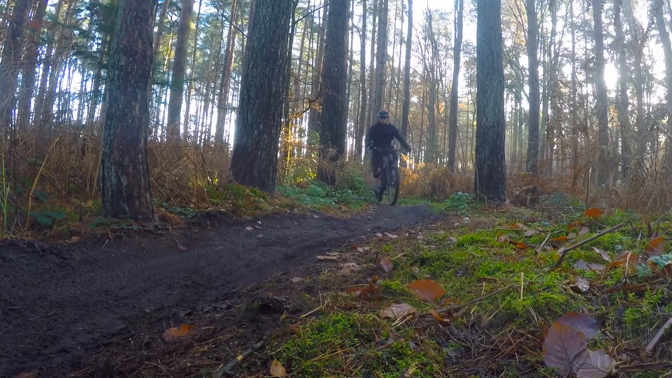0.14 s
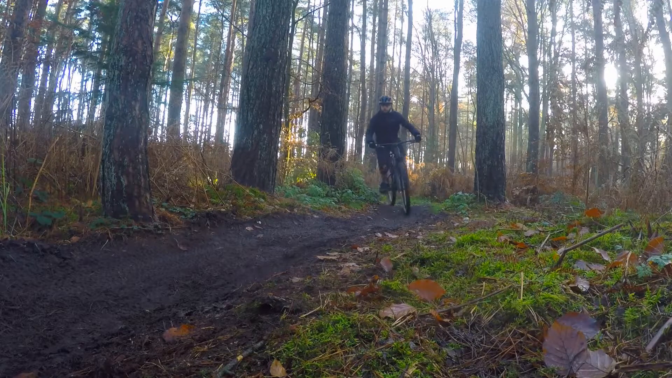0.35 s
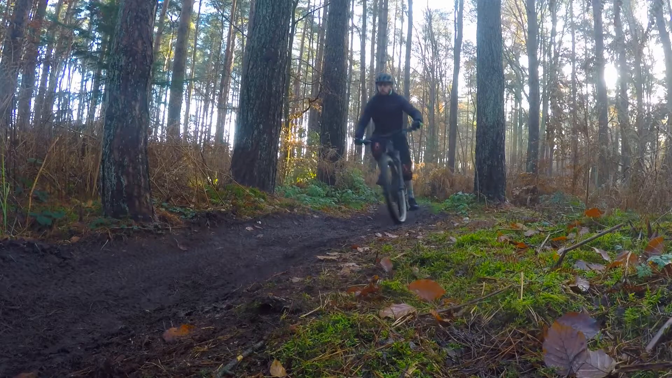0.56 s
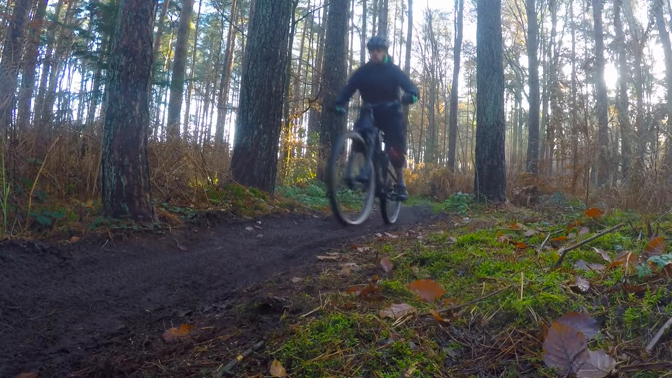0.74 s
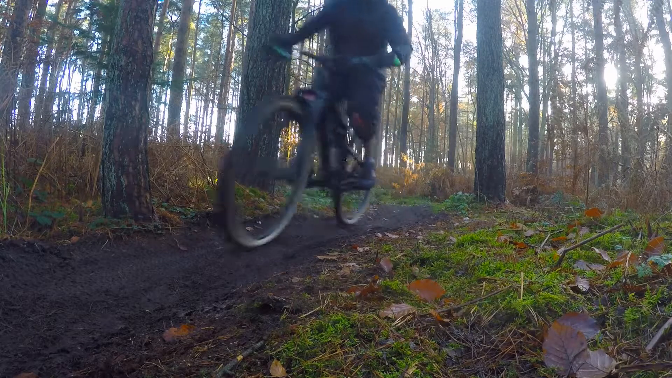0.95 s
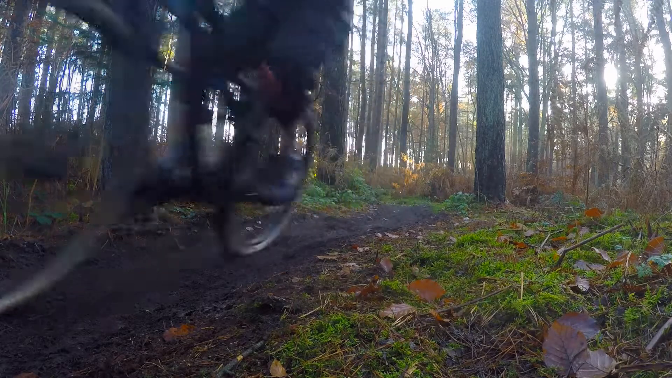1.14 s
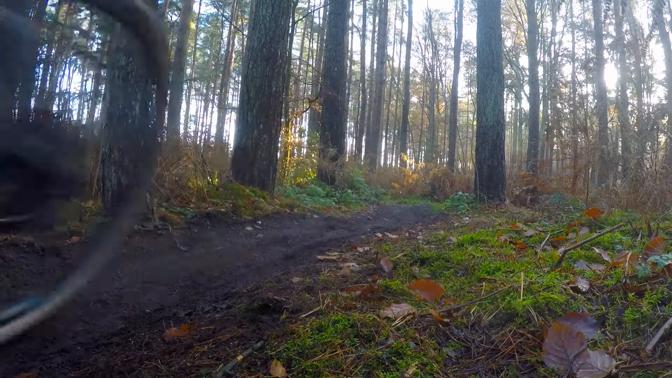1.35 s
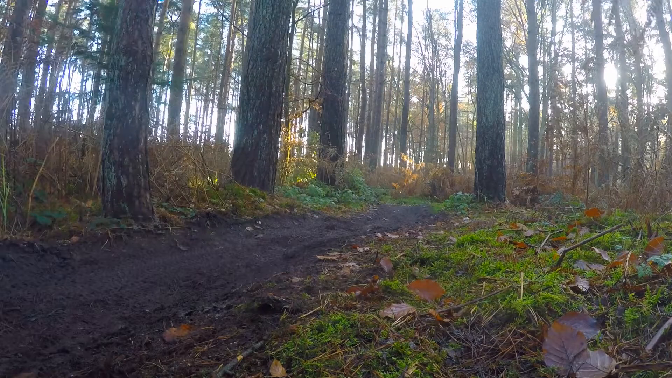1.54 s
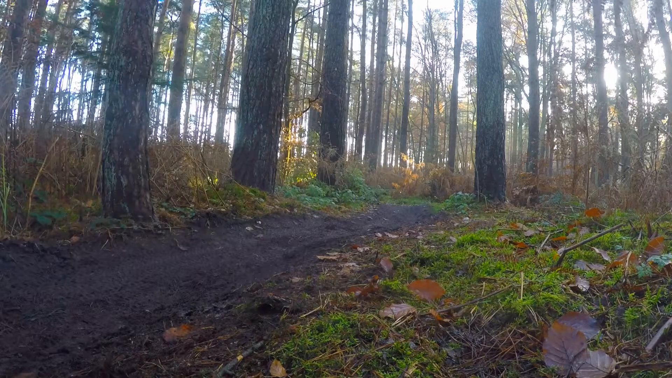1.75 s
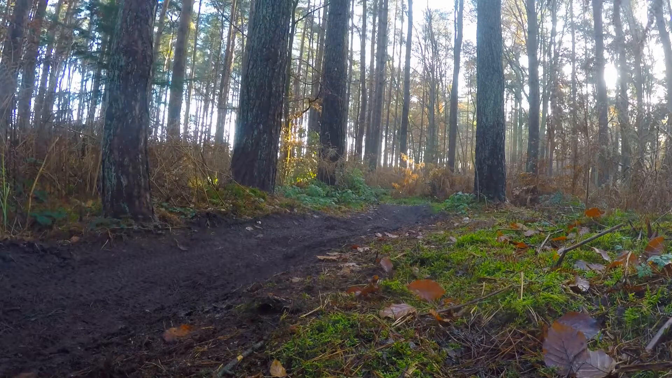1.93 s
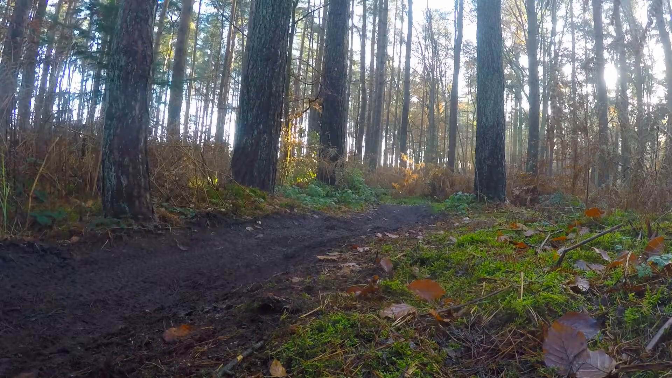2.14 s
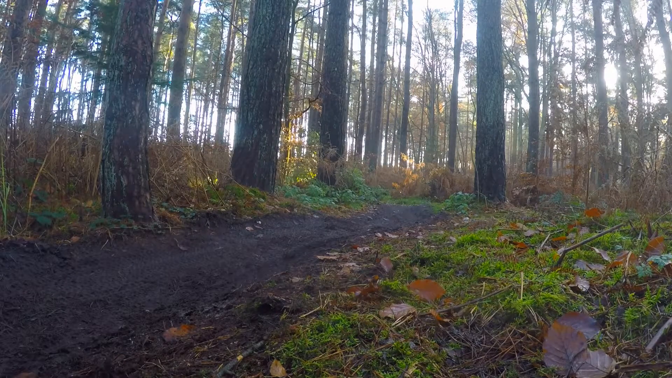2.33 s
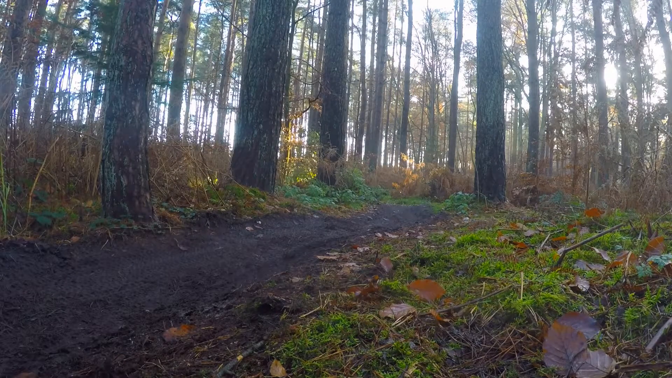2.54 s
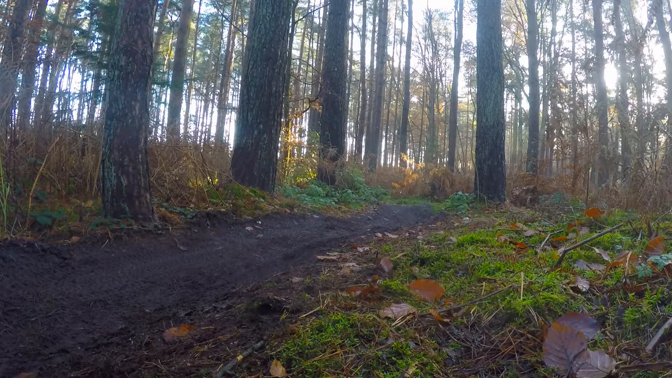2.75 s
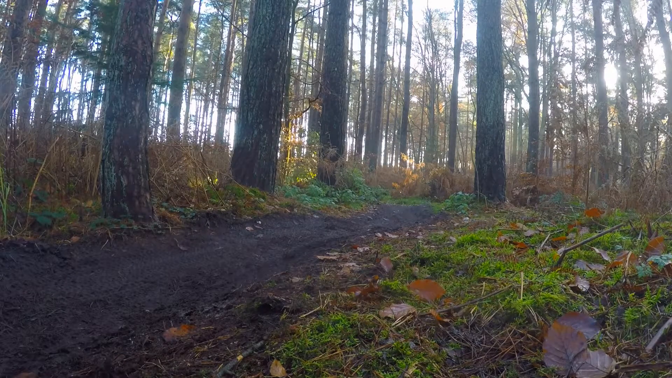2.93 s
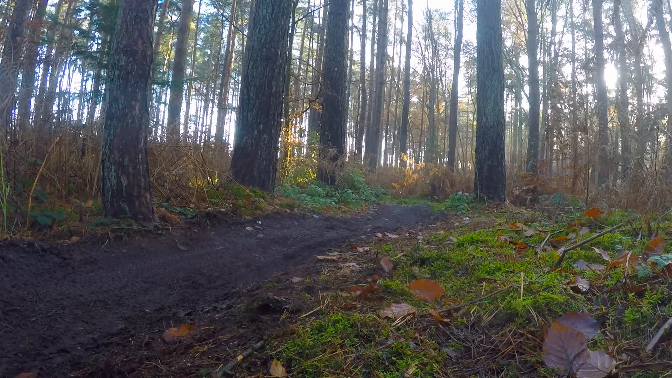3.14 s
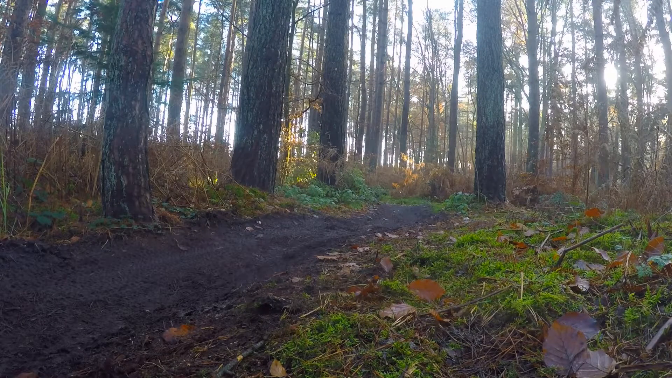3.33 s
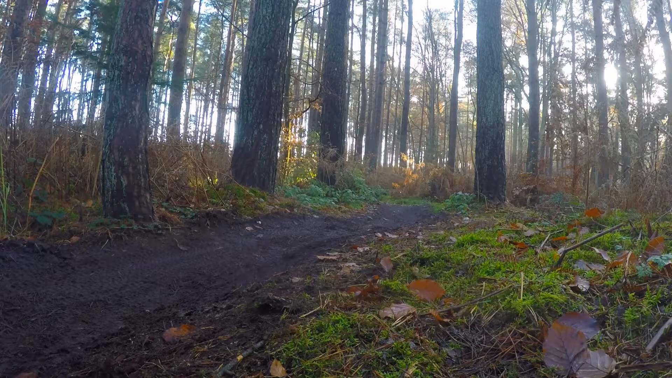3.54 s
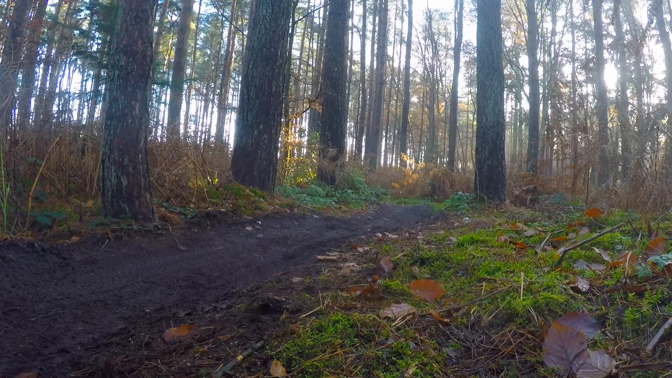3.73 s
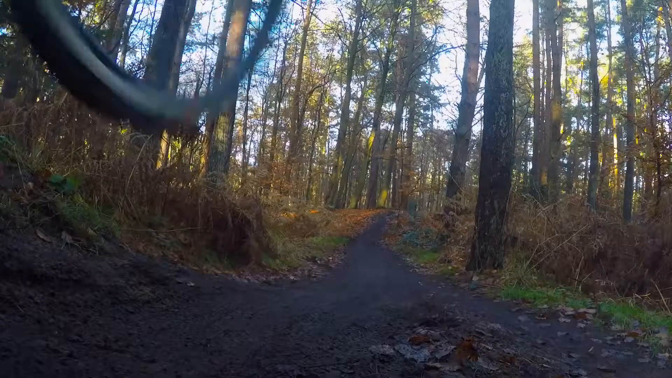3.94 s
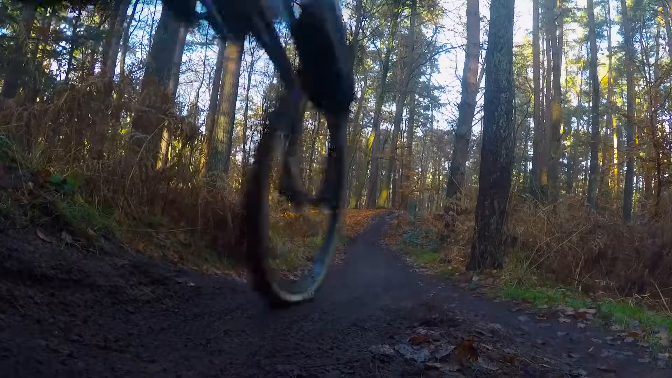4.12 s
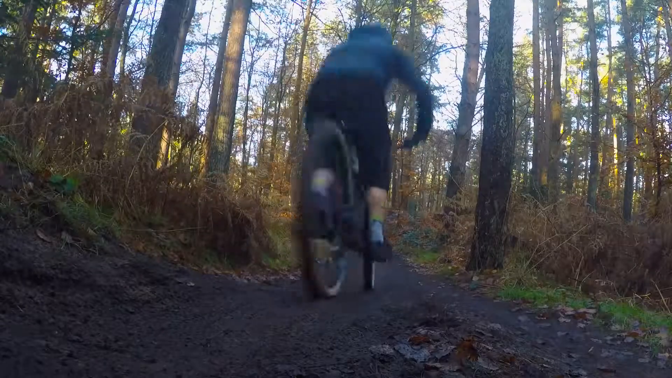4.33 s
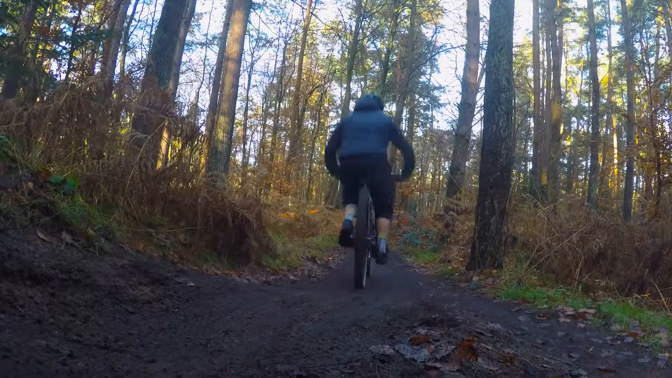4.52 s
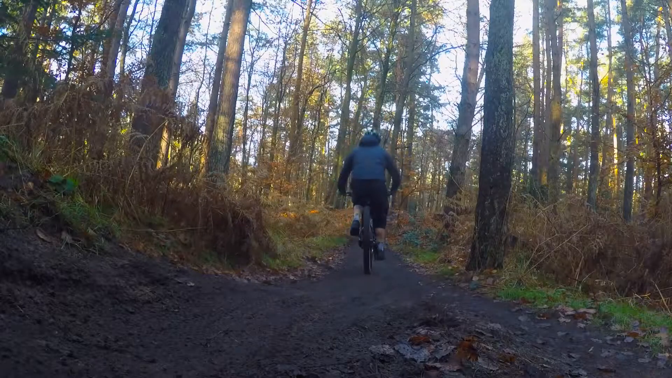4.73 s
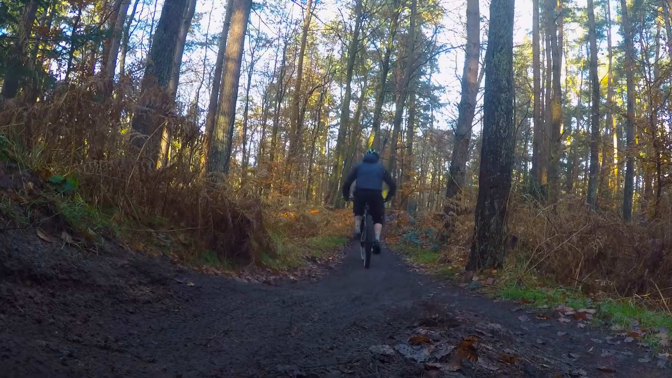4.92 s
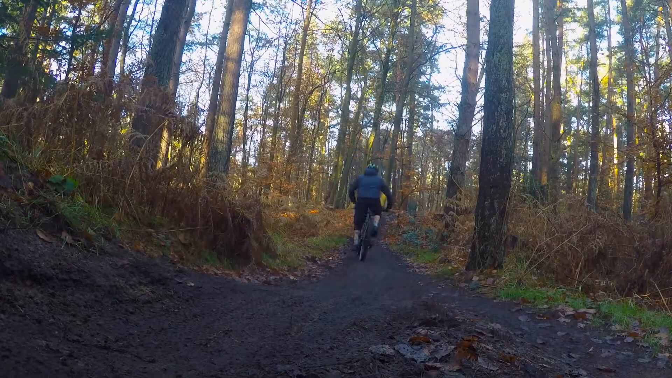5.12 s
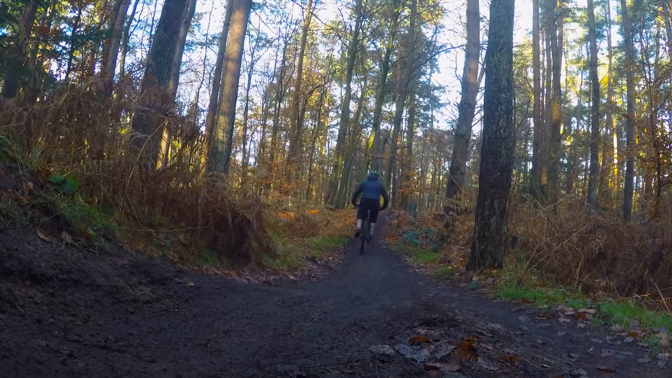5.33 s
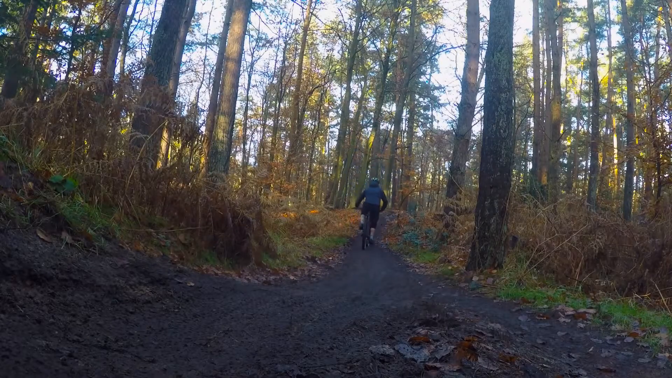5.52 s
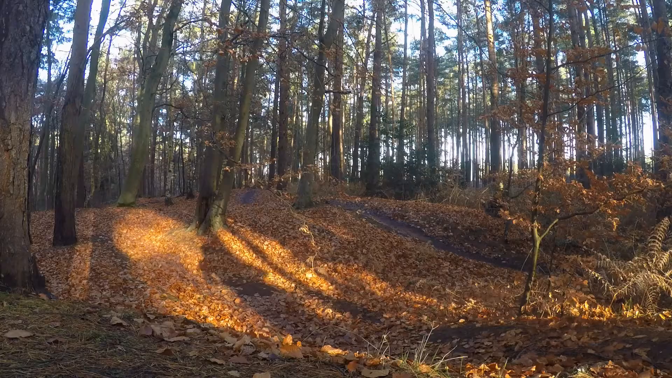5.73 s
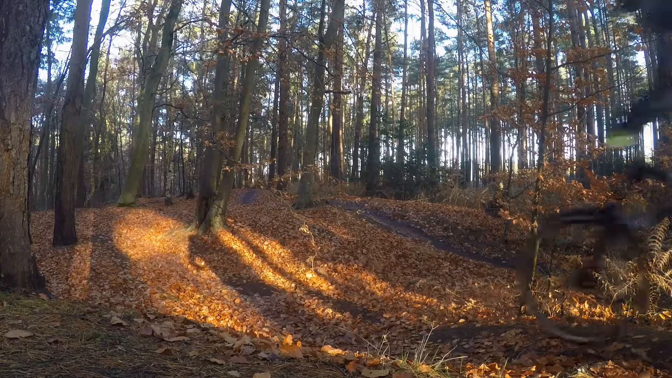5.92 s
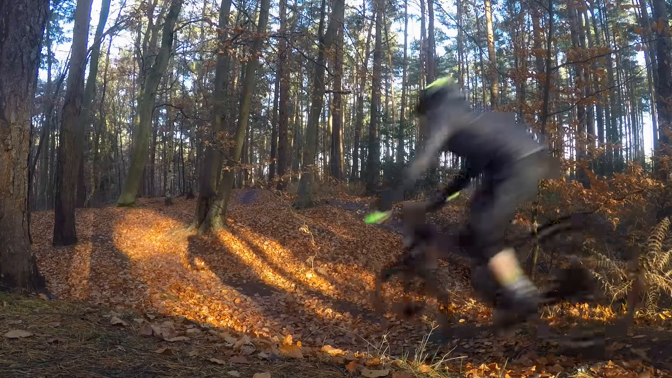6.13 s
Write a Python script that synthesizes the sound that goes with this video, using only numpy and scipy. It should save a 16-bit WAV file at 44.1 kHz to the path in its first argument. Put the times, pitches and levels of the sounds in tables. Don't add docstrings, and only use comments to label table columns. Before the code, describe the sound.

A mountain bike coasts past on a forest dirt trail, freewheel ticking fast, tyres drumming and thumping, then two more abrupt close passes.

```python
import sys
import numpy as np
from scipy import signal
from scipy.fft import rfft, irfft
from scipy.io import wavfile
from scipy.ndimage import uniform_filter1d

SR = 44100
rng = np.random.default_rng(int(sys.argv[2]) if len(sys.argv) > 2 else 0)


def wrap_up_sound(samples):
    columns = np.atleast_2d(samples).T
    tamed = np.clip(columns, -1, 1)
    steps = np.round(tamed * 32767).astype(np.int16)
    wavfile.write(sys.argv[1], SR, steps)


def field_ratio(decibels):
    return 10 ** (np.asarray(decibels, dtype=float) / 20)


N = 276451
T = np.arange(N) / SR

# [start t/s, end t/s]
PASSES = [
    (0, 3.922),
    (3.926, 5.758),
    (5.762, 6.268),
]
# [t/s, nearness level/dB], 0 = alongside
NEARNESS = [
    [(0, -29), (.99, -24.5), (1.08, -18.5), (1.36, -10.5), (1.62, -1.5), (1.81, -10.5), (2.16, -19.5),
     (2.27, -22.5), (3.92, -36.5)],
    [(3.926, -12), (4.594, -13.5), (4.772, -22), (5.55, -23), (5.758, -20.5)],
    [(5.762, -22), (5.882, -16), (6.268, -18.5)],
]
# [wind level/dB, ground rumble level/dB, tyre drumming level/dB, soil crunch level/dB, leaf rustle level/dB]
GROUND = [
    (-50, -38.5, -35, -51, -36.5),
    (-40, -41, -32, -51, -36.5),
    (-52, -43, -37.5, -57, -35),
]
# [level/dB at the start, level/dB at the end], as the camera's gain creeps up
FOREST_MURMUR = [
    (-70.5, -57.5),
    (-57, -54.5),
    (-60.5, -60.5),
]
TRUNKS = [3, -1.7, -1]
# [t/s, level/dB, rise/s, fall/s]
WIND_GUSTS = [(3.927, 8.5, 0.00064, 0.13), (4.28, -9, 0.17, 0.2), (4.3, 14.5, 0.11, 0.24),
              (7.8, 4, .1, 0.23), (1.6, -0.5, .1, 0.086), (5.1, 3.5, 0.11, 0.092)]
# [t/s, level/dB, half length/s]
ROOTS_AND_RUTS = [(0.687, 7.5, 0.25), (1.18, 4.5, 0.1), (1.32, 3.5, 0.33), (1.78, 3, 0.03), (1.862, 0, .02),
                  (1.08, -0.5, 0.11), (2.53, 1, 0.18), (3.55, 1.5, 0.36), (2.22, -9, .07),
                  (3.953, -5, 0.039), (4.163, -10, 0.078), (4.316, -4, 0.11), (4.425, 7.5, 0.23),
                  (4.844, 6, 0.28), (5.197, 16, .14), (5.883, 4.5, 0.077)]

# [f/Hz, density level/dB]
RUMBLE_SPECTRUM = [(18, -12), (28, -6), (52, -2.5), (75, -9), (100, -16.5), (135, -21)]
CASING_SPECTRUM = [(65, -10.5), (100, -1), (160, 3.5), (250, -3.5), (340, -1.5), (450, -6.5), (540, -16),
                   (750, -22), (1200, -25.5)]
CRUNCH_SPECTRUM = [(500, -22), (850, -3), (1100, 4), (1500, 2), (2100, 1), (3000, -4.5), (5000, -34)]
RUSTLE_SPECTRUM = [(1500, -13), (2350, -2), (2900, 2.5), (3450, -6), (4700, -2), (6000, -9.5),
                   (9000, -15.5), (11000, -15), (15500, -15)]
# [f/Hz, density level/dB]
HISS_SPECTRUM = [(2000, 2.9), (5000, 9.5), (9000, 4.7), (13000, 7.8), (15150, 3)]
# [f/Hz, rms level/dB]
WHINE_LINES = [(8549.4, -86), (8599.7, -76), (8650, -71.5)]
# [t/s, f/Hz, level/dB]
BRAKE_SQUEAK = [(5.8, 1215, -76), (5.85, 1247, -66), (6.18, 1300, -67), (6.21, 1227, -58),
                (6.27, 1170, -64)]

# [t/s, level/dB, f/Hz, t60/s]
AIR_SHOVES = [(4.86, -14, 41.8, 0.23), (4.9, -7, 33.4, 0.22), (4.99, -16.5, 28.4, 0.45),
              (5.3, -22.5, 37.9, 0.62), (5.51, -16, 25.9, 0.4), (5.57, -12, 37.55, 0.37),
              (5.69, -16, 30, 0.24)]
# [t/s, level/dB, bounce f/Hz, t60/s]
LANDINGS = [(1.476, -25, 55, 0.13), (1.527, -21, 41.7, 0.21), (1.699, -19, 55, 0.069),
            (4.2, -9, 43.8, 0.17), (4.213, -14, 29.3, 0.21), (4.24, -16, 46.3, 0.22),
            (4.395, -12.5, 27.2, 0.34), (4.379, -3, 46.6, 0.21), (4.43, -12, 36, 0.2),
            (5.133, -21.5, 31.1, 0.62), (6.234, -21, 23.9, 0.27), (6.265, -29, 50.1, .1),
            (5.091, -34, 40, 0.092), (5.247, -23, 30, 0.17)]
# [t/s, level/dB, f/Hz, t60/s]
CASING_KNOCKS = [(1.488, -25, 325, 0.093), (1.52, -25, 307, 0.051), (1.682, -19.5, 272, 0.07),
                 (1.695, -18.5, 162, .09), (1.82, -25.5, 407, 0.19), (1.652, -24.5, 334, .04),
                 (1.575, -28, 150, 0.15), (4.205, -19.5, 200, 0.084), (1.784, -22, 409, 0.14),
                 (1.7975, -15.5, 270, 0.042), (1.8008, -10.5, 296, 0.035), (1.808, -21, 321, 0.13),
                 (4.392, -28, 500, 0.072), (4.49, -27, 376, 0.075), (4.43, -25, 150, 0.11),
                 (4.048, -26, 252, 0.026), (4.09, -28, 296, .03), (4.118, -34, 280, 0.032),
                 (4.146, -29.5, 320, 0.03), (4.2, -22, 278, 0.089), (4.2295, -10.5, 287, 0.03),
                 (4.31, -30.5, 381, 0.11), (4.379, -12, 235, 0.061), (4.3835, -15.5, 431, 0.088),
                 (4.3815, -13.5, 192.4, 0.084), (4.402, -23, 415, 0.12), (4.475, -26.5, 382, 0.15),
                 (5.12, -6, 270, 0.02), (5.127, -20.5, 324, 0.025), (5.162, -7, 253, 0.028),
                 (5.17, -19.5, 330, 0.09), (5.221, -19.5, 337, 0.031), (4.99, -42, 193, 0.059),
                 (6.1975, -25, 298, 0.03), (6.2115, -23, 170, 0.042), (6.2155, -25, 328, 0.033),
                 (6.2245, -26, 310, 0.027), (6.2277, -15, 239, 0.029), (6.241, -24, 210, .04),
                 (6.252, -29, 330, .05)]
# [t/s, level/dB, f/Hz, t60/s]
STONE_PINGS = [(1.782, -30.5, 2970, 0.065), (1.786, -29.5, 2378, 0.1), (1.785, -31.5, 1776, 0.1),
               (2.459, -39, 2840, 0.08), (2.461, -42.5, 1630, 0.056), (4.229, -30.5, 1660, 0.014),
               (4.229, -28.5, 2920, 0.012), (4.357, -37, 3080, .08), (5.1185, -21, 1560, 0.02),
               (5.178, -26, 2090, 0.043), (1.79, -32.5, 1880, 0.041), (1.795, -28, 2490, 0.051),
               (5.175, -23.5, 2600, 0.039), (5.175, -26.5, 1850, 0.046), (5.5, -45.5, 613, 0.19)]

# [t/s, level/dB, centre f/Hz, t60/s]
TWIGS_AND_CHAIN = [(.471, -53, 3150, 0.059), (1.7, -38, 4040, 0.034), (2.327, -52, 5940, 0.044),
                   (2.344, -53.5, 4060, 0.15), (2.449, -53, 3800, .03), (2.459, -43.5, 3900, 0.11),
                   (4.199, -38, 1550, 0.071), (4.226, -40, 2530, .016), (4.357, -41, 3640, 0.084),
                   (4.378, -30, 1840, 0.12), (4.506, -37.5, 978, 0.019), (4.782, -40, 3170, 0.082),
                   (5.085, -49.5, 9000, 0.0085), (5.118, -31.5, 1180, 0.081), (5.126, -47, 2700, 0.41),
                   (5.12, -44.5, 5860, 0.096), (5.177, -43, 6540, 0.099), (5.174, -36, 1640, 0.21),
                   (5.22, -41, 1380, 0.19), (5.272, -47, 5660, 0.093), (5.499, -51.5, 1750, 0.11)]
# [t/s, level/dB, centre f/Hz, t60/s]
THROWN_SOIL = [(1.525, -41, 1200, 0.12), (1.684, -40, 1200, .05), (1.781, -33.5, 2500, 0.16),
               (1.787, -35, 6000, 0.047), (1.987, -54, 11000, .05), (3.924, -44, 7000, 0.018),
               (4.172, -43, 9000, 0.027), (4.78, -36, 3500, 0.0071), (5.16, -37, 1800, 0.066),
               (5.759, -40.5, 2990, 0.0048)]
# [t/s, level/dB, centre f/Hz, t60/s]
METAL_RINGS = [(.467, -52, 820, .02), (.4716, -53, 3900, .011), (.4716, -51, 2970, .013),
               (.4766, -57, 3800, .027), (.4766, -55, 2800, .03), (.951, -54, 540, .14),
               (1.041, -56.5, 2870, .5), (1.211, -52.5, 2930, .26), (1.786, -40, 610, .3),
               (2.4576, -48.5, 11200, .06), (2.4576, -50, 14300, .035), (2.461, -49, 4600, .06),
               (2.461, -53.5, 6400, .053), (2.501, -55, 380, .23), (4.3272, -49, 14000, .025),
               (4.3272, -45, 4650, .03), (4.379, -40, 5400, .055), (4.4045, -35, 4500, .03),
               (4.4175, -42, 4600, .033), (5.0845, -50, 5100, .025), (5.1172, -47, 12600, .03),
               (5.161, -54, 12800, .088), (5.186, -41, 640, .08), (5.221, -56, 12800, .04),
               (5.2722, -53, 12600, .11), (5.2722, -51, 7100, .04), (5.673, -64, 12000, .03),
               (5.726, -65, 13000, .03), (6.2545, -47, 1500, .03), (4.378, -50, 12000, .03)]
# [t/s, level/dB, centre f/Hz, t60/s]
TYRE_SKIDS = [(1.241, -52.5, 1100, .11), (1.691, -45.5, 4000, .065), (1.721, -54.5, 12500, .1),
              (2.021, -59, 4900, .24), (4.379, -54, 11000, .09), (4.386, -43.5, 4400, .05),
              (4.391, -38, 2500, .048), (4.441, -57.5, 12500, .091), (6.206, -50, 1400, .08),
              (6.213, -48, 520, .05)]
# [t/s, level/dB, centre f/Hz, t60/s]
FRAME_HUMS = [(1.89, -46, 438, .73), (1.9, -60, 656, 1.4), (1.9, -53, 539, 0.69), (1.95, -51, 338, 0.86),
              (4.275, -39.5, 353, 0.25)]
SNAPS = [(TWIGS_AND_CHAIN, 0.91, 0.02), (THROWN_SOIL, 1.4, 0.081), (METAL_RINGS, 0.11, 0.13),
         (TYRE_SKIDS, 0.81, 0.49), (FRAME_HUMS, 0.04, 0.086)]

# [f/Hz, width/Hz, level/dB]
SHELL_MODES = [(2840, 850, 0.5), (3570, 560, -5), (3980, 780, 3), (4600, 590, 7), (5070, 630, 0.5),
               (5620, 370, -8)]
PAWL_MODES = [(9730, 780, 4.5), (10680, 900, 14), (11740, 990, 9)]
SPRING_MODES = [(12600, 1400, -5.5), (14000, 900, -5.5), (14900, 600, -9.5)]
FLANGE_MODES = [(6490, 990, -1), (7660, 2300, -5)]
SPRING_FACING = [4, 7.5, -2]
FLANGE_FACING = [-0.4, 2, 5]
# [t/s, ratchet rate/teeth per s]
COASTING = [
    [(2.644, 82), (2.722, 81), (2.781, 52), (3.62, 54), (3.8, 42), (3.92, 48)],
    [(4.4179, 70.1), (4.582, 27.1), (4.675, 85.7), (4.748, 15), (4.77, 30)],
]
# [t/s, pawl ring level/dB, shell ring relative level/dB]
HUB_LEVELS = [(.76, -54, 0), (1.2, -43, 5.5), (1.39, -35, 2.5), (1.45, -31, 0), (1.57, -26, 0.5),
              (1.69, -24, -4), (2.64, -49.5, -1.5), (2.73, -48.5, -0.5), (2.8, -56.5, 3), (3.92, -62, 2),
              (3.926, -48, 3), (3.99, -42, 8), (4.04, -45, 5), (4.33, -35.5, -1.5), (4.42, -41, 0),
              (4.78, -52, 4), (5.83, -37, -4), (6.27, -41, -9.5)]
# [t/s, pawl ring level/dB, shell ring level/dB]
APPROACH_DROPS = [(0.7627, -51, -60), (0.7841, -57, -55), (0.8044, -60, -64), (0.826, -57, -60),
                  (0.846, -54, -57), (0.8714, -55, -60), (0.8989, -54, -59), (0.9218, -56, -59),
                  (0.9467, -56, -58), (0.9672, -53, -56), (0.987, -53, -53), (1.0053, -48, -59),
                  (1.0224, -53, -53), (1.042, -53, -59), (1.068, -50, -55), (1.0899, -49, -55),
                  (1.1064, -55, -59), (1.1209, -50, -59), (1.1363, -48, -58), (1.152, -47, -48),
                  (1.167, -48, -50), (1.1844, -46, -47), (1.2027, -47, -53), (1.2241, -48, -48),
                  (1.2474, -48, -46), (1.268, -44, -51), (1.296, -45, -47), (1.3244, -41, -45),
                  (1.3503, -43, -43), (1.374, -40, -42)]
ALONGSIDE_DROPS = [(1.3952, -48, -55), (1.4132, -35.5, -37), (1.4326, -35, -38.5), (1.4513, -30.5, -38),
                   (1.4654, -32, -40), (1.4776, -32, -38), (1.49, -29, -34.5), (1.498, -32, -35),
                   (1.506, -32, -33), (1.5152, -32, -34), (1.5242, -28, -29), (1.5344, -26, -37),
                   (1.5439, -21, -34), (1.5544, -31, -30), (1.5661, -24, -30), (1.5788, -24, -32),
                   (1.5928, -23, -33), (1.6095, -22, -29), (1.6277, -21, -32), (1.6507, -24, -33.5),
                   (1.6785, -24.5, -35)]
OVERHEAD_DROPS = [(3.929, -31.5, -36.5), (3.949, -33, -39), (3.9662, -32, -37), (3.982, -35, -37),
                  (4.0035, -36, -37), (4.0328, -31.5, -34.5), (4.06, -33, -36.5), (4.0858, -30, -35),
                  (4.114, -29.5, -33.5), (4.1383, -29, -37.5), (4.1634, -29, -36.5), (4.1884, -30, -38.5),
                  (4.2263, -33, -39), (4.2709, -31, -44.5), (4.3272, -45, -47)]
SIDEWAYS_DROPS = [(5.834, -38, -49), (5.8556, -38, -48), (5.8721, -39, -50), (5.888, -39, -48.5),
                  (5.905, -39, -49), (5.9219, -37, -50), (5.9381, -38, -45), (5.9526, -38, -50),
                  (5.9674, -36, -51), (5.9826, -33, -45), (5.9982, -34, -47), (6.0145, -39, -47),
                  (6.0312, -38, -51), (6.0467, -35, -50), (6.0624, -39, -50), (6.0786, -36, -51),
                  (6.094, -31, -48), (6.11, -39, -48), (6.127, -32, -52), (6.1424, -32, -45),
                  (6.1599, -38, -49), (6.1754, -30.5, -56), (6.1904, -38, -53), (6.2058, -35, -51),
                  (6.2204, -37, -50), (6.2387, -38, -51), (6.2554, -34, -51)]
# [drops, pawl gain/dB, shell gain/dB]
NEAR_DROPS = [(APPROACH_DROPS, 0.7, 6.9), (ALONGSIDE_DROPS, 1.2, 8.5),
              (OVERHEAD_DROPS, -0.46, 7.9), (SIDEWAYS_DROPS, 3.1, 8.7)]
# [t/s, lag/ms, level/dB]
SOIL_REFLECTION = [(.76, .5, -18), (1.48, 0.51, -10), (1.6, 0.47, -15), (3.92, .55, -14), (3.93, 0.56, -14),
                   (4.035, 0.44, -8.5), (4.08, .57, -10), (4.2, .58, -4), (4.78, .58, -8), (5.83, 0.4, -10),
                   (5.89, 0.62, -10), (5.96, 0.62, -3), (5.99, 0.57, -12), (6.08, 0.59, -2.5),
                   (6.27, .54, -5)]


def unit(x):
    return x / np.sqrt(np.mean(x ** 2))


def colour(x, spectrum):
    hz, db = np.transpose(spectrum)
    f = np.maximum(np.fft.rfftfreq(N, 1 / SR), 1)
    gain = field_ratio(np.interp(np.log(f), np.log(hz), db, left=-90, right=-90))
    return unit(irfft(rfft(x) * gain, N))


def walk(rate):
    k = int(SR / rate)
    held = np.repeat(rng.standard_normal(N // k + 1), k)
    return unit(uniform_filter1d(uniform_filter1d(held, k), k)[:N])


def swell(table):
    return sum(np.interp(T, [s - rise_s, s, s + fall_s], [0, db, 0]) for s, db, rise_s, fall_s in table)


def fade(x, t60_s):
    return signal.lfilter([1], [1, -np.exp(-np.log(1000) / (t60_s * SR))], x)


def ring(x, hz, width):
    b, a = signal.iirpeak(hz, hz / width, fs=SR)
    twice = signal.lfilter(b, a, signal.lfilter(b, a, x))
    return twice / np.sqrt(np.pi * width / SR / 2)


def add(out, s, x):
    i = int(s * SR)
    out[i:i + len(x)] += x[:N - i]


def spot_at(s):
    return np.minimum(np.searchsorted(np.transpose(PASSES)[1], s), 2)


def whine():
    t = T - 0.007
    return sum(field_ratio(db) * np.sqrt(2) * np.sin(2 * np.pi * hz * t) for hz, db in WHINE_LINES)


def hiss(heard):
    duck_from_db, duck_slope, duck_s = -51, 0.28, 0.12
    loud_db = 10 * np.log10(uniform_filter1d(heard ** 2, size=int(duck_s * SR)) + 1e-9)
    hiss_db = -70 - duck_slope * np.maximum(loud_db - duck_from_db, 0)
    return field_ratio(hiss_db) * colour(rng.standard_normal(N), HISS_SPECTRUM)


def grains(rate, spread_db):
    hit = rng.random(N) < rate / SR
    sign = np.sign(rng.standard_normal(N))
    return hit * sign * field_ratio(spread_db * np.minimum(rng.exponential(size=N), 3))


def rolling():
    near_db = np.interp(T, *np.concatenate(NEARNESS).T)
    ruts_db = swell([(s, db, half_s, half_s) for s, db, half_s in ROOTS_AND_RUTS])
    forest_db = np.interp(T, np.ravel(PASSES), np.ravel(FOREST_MURMUR))
    wind_db, ground_db, casing_db, soil_db, leaves_db = np.transpose(GROUND)[:, spot_at(T)]

    rumble = np.hypot(field_ratio(wind_db + swell(WIND_GUSTS)), field_ratio(ground_db + 0.53 * near_db))
    casing = field_ratio(casing_db + 0.57 * near_db + ruts_db)
    crunch = np.hypot(field_ratio(forest_db), field_ratio(soil_db + 0.63 * near_db + 0.53 * ruts_db))
    rustle = field_ratio(leaves_db + near_db + 0.12 * ruts_db)

    noise = rng.standard_normal((4, N))
    bumps = walk(28)
    drummed = noise[1] + 0.5 * unit(grains(200, 3))
    gritty = noise[2] + 0.37 * unit(grains(400, 2.5))
    leafy = noise[3] + 0.18 * unit(grains(460, 3.6))
    out = rumble * field_ratio(4.0 + 1.7 * walk(14)) * colour(noise[0], RUMBLE_SPECTRUM)
    out += casing * field_ratio(-0.5 + 2.27 * bumps) * colour(drummed, CASING_SPECTRUM)
    out += crunch * field_ratio(-0.75 + 0.71 * bumps) * colour(gritty, CRUNCH_SPECTRUM)
    out += rustle * field_ratio(-4.0 + 2.2 * walk(40)) * colour(leafy, RUSTLE_SPECTRUM)
    return out


def brake_rub():
    s, hz, db = np.transpose(BRAKE_SQUEAK)
    pitch_hz = np.interp(T, s, hz) * (1 + 0.009 * walk(70))
    level_db = np.interp(T, s, db, left=-120) + 5.6 * walk(25)
    return field_ratio(level_db) * np.sin(2 * np.pi * np.cumsum(pitch_hz) / SR)


def blows(table, sag, sag_s, rough, contact_s, overtones=()):
    out, t = np.zeros(N), T[:SR // 2]
    flutter = walk(150)[:len(t)]
    for k, (s, db, hz, t60_s) in enumerate(table):
        wobble = 1 + rough * np.roll(flutter, 997 * k)
        pitch_hz = hz * (1 + sag * np.exp(-t / sag_s)) * wobble
        phase = 2 * np.pi * np.cumsum(pitch_hz) / SR
        wave = np.sin(phase) + sum(field_ratio(part_db) * np.sin(ratio * phase) for ratio, part_db in overtones)
        envelope = field_ratio(db - 60 * t / t60_s) * (1 - np.exp(-t / contact_s))
        add(out, s, -envelope * wave)
    return out


def wind_buffets():
    return blows(AIR_SHOVES, sag=0.12, sag_s=0.029, rough=0.16, contact_s=0.018,
                 overtones=[(2.3, -11), (3.6, -21)])


def snaps():
    out, t = np.zeros(N), T[:16384]
    f = np.maximum(np.fft.rfftfreq(len(t), 1 / SR), 1)
    for events, octaves, rattle in SNAPS:
        noises = rng.standard_normal((len(events), 2, len(t)))
        for (s, db, hz, t60_s), noise in zip(events, noises):
            shape = np.exp(-0.5 * (np.log2(f / hz) / octaves) ** 2) * np.sqrt(hz / f)
            band = unit(irfft(rfft(noise[0]) * shape, len(t)))
            grit = field_ratio(2.0 * unit(uniform_filter1d(noise[1], size=60)))
            decay = field_ratio(db - 60 * np.maximum(t / t60_s - rattle, 0))
            add(out, s, decay * grit * band)
    return out


def stone_pings():
    return blows(STONE_PINGS, sag=0.009, sag_s=0.014, rough=0.018, contact_s=0.0001)


def casing_knocks():
    return blows(CASING_KNOCKS, sag=0.11, sag_s=0.00097, rough=0.08, contact_s=0.00094,
                 overtones=[(0.55, -13.5), (1.47, -15.5)])


def wheel_landings():
    return blows(LANDINGS, sag=1.0, sag_s=0.0065, rough=0.043, contact_s=0.0013)


def ticks():
    coasting_s = []
    for coast in COASTING:
        s, rate = np.transpose(coast)
        t = T[(T >= s[0]) & (T < s[-1])]
        teeth = np.floor(np.cumsum(np.interp(t, s, rate)) / SR)
        coasting_s.append(t[np.r_[0, np.flatnonzero(np.diff(teeth))]])
    at = np.concatenate(coasting_s)
    s, db, shell_db = np.transpose(HUB_LEVELS)
    scatter = np.clip(rng.standard_normal((2, len(at))), -2, 2)
    far_pawl_db = np.interp(at, s, db) + 0.54 * scatter[0]
    far_shell_db = np.interp(at, s, db + shell_db) + 0.5 * scatter[1]
    drops = [np.array([at, far_pawl_db, far_shell_db])]
    for rows, *gains_db in NEAR_DROPS:
        drops.append((np.array(rows) + [0, *gains_db]).T)
    at, pawl_db, shell_db = np.hstack(drops)
    return at, pawl_db, shell_db, np.interp(at, s, db) - db.max()


def off_the_soil(direct):
    s, lag_ms, echo_db = np.transpose(SOIL_REFLECTION)
    echo = field_ratio(np.interp(T, s, echo_db))
    late = np.interp(T - np.interp(T, s, lag_ms) / 1000, T, uniform_filter1d(direct, size=3))
    return (direct - echo * late) / np.sqrt(1 + echo ** 2)


def freewheel():
    s, pawl_db, shell_db, far_db = ticks()
    facing = np.array([SPRING_FACING, FLANGE_FACING, TRUNKS])
    spring_db, flange_db, trunks_db = facing[:, spot_at(s)]
    modes = [(pawl_db - 28.5, m) for m in PAWL_MODES]
    modes += [(pawl_db + spring_db - 17.0, m) for m in SPRING_MODES]
    modes += [(shell_db - 18.0, m) for m in SHELL_MODES]
    modes += [(shell_db + flange_db - 18.0, m) for m in FLANGE_MODES]
    wet = field_ratio(-21.5 + trunks_db - 0.3779 * far_db)
    sharp = field_ratio(0.3 * far_db - 3.0)
    at, out = (s * SR).astype(int), 0
    mixes = rng.standard_normal((len(modes), len(s)))
    for (gain_db, (hz, width, mode_db)), mix in zip(modes, mixes):
        size = field_ratio(gain_db + mode_db + 1.6 * np.clip(mix, -2, 2))
        drops = np.bincount(at, size, N)
        echoes = np.bincount(at, size * wet, N)
        clicks = 8.2 * np.bincount(at, size * sharp, N)
        rattle_t60_s = 0.028 * (4500 / hz) ** 0.19
        rattle = fade(drops, rattle_t60_s) + fade(echoes, 0.1)
        out = out + ring(rattle * rng.standard_normal(N) + clicks, hz, width)
    return off_the_soil(out)


def scene():
    background = rolling() + wind_buffets() + brake_rub()
    strikes = snaps() + stone_pings() + casing_knocks() + wheel_landings()
    return (background + strikes + freewheel())[None]


def low_pass(x):
    return signal.sosfilt(signal.butter(12, 16450, fs=SR, output="sos"), x)


def record(dry):
    ceiling = 0.94
    wet = ceiling * np.tanh(dry / ceiling) + whine() + hiss(dry)
    top_cut = signal.cheby1(14, 0.5, 15250, fs=SR, output="sos")
    wet = signal.sosfilt(top_cut, wet)
    return low_pass(wet)


dry = scene()
out = record(dry)
wrap_up_sound(out)
```